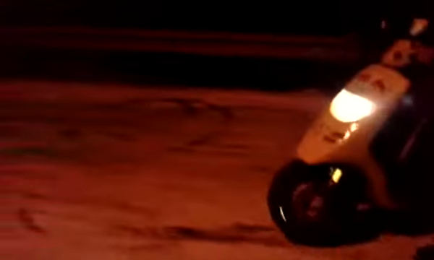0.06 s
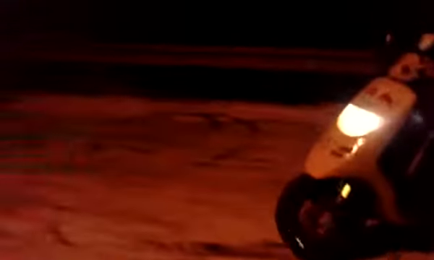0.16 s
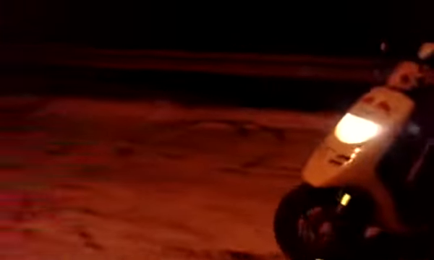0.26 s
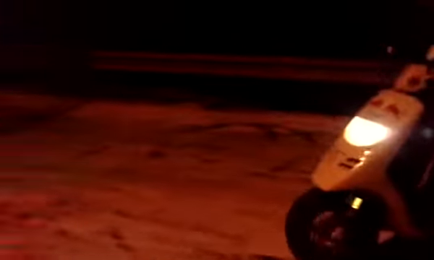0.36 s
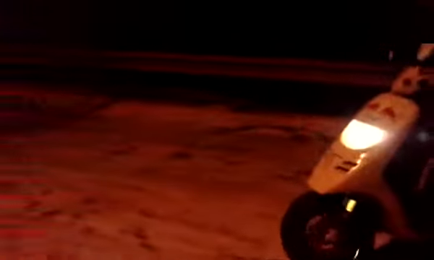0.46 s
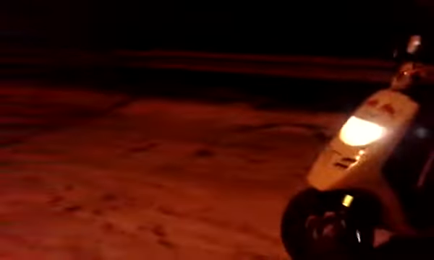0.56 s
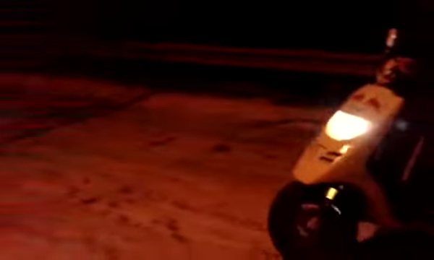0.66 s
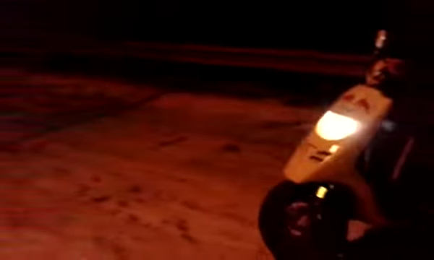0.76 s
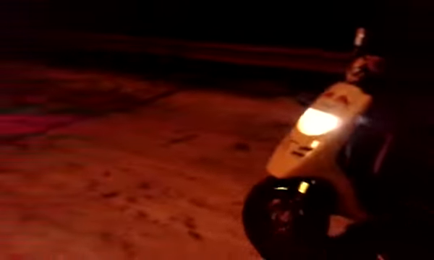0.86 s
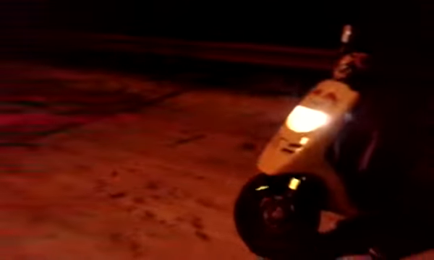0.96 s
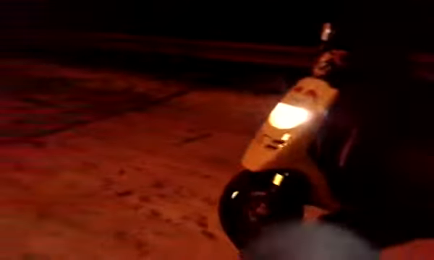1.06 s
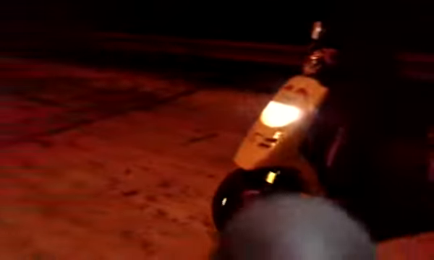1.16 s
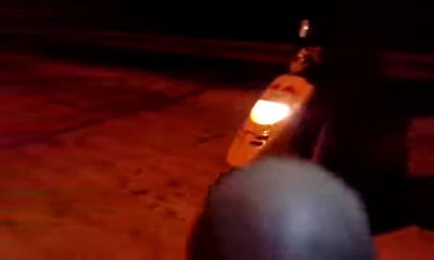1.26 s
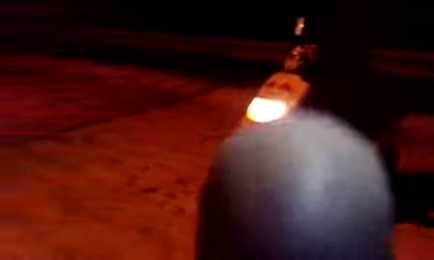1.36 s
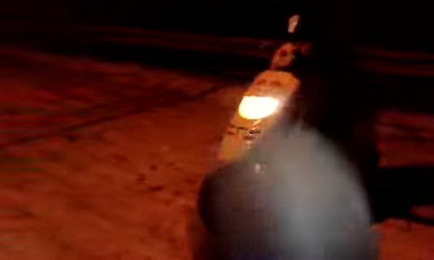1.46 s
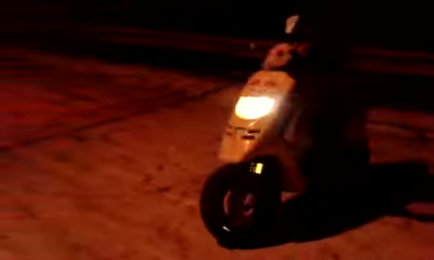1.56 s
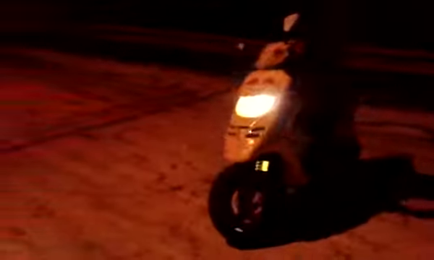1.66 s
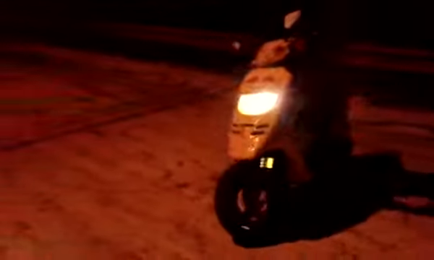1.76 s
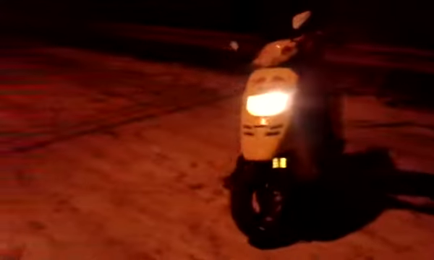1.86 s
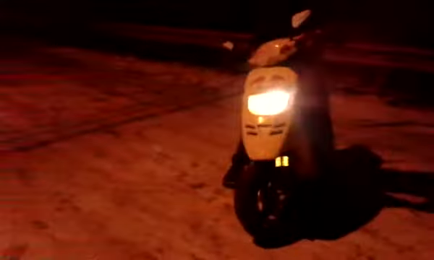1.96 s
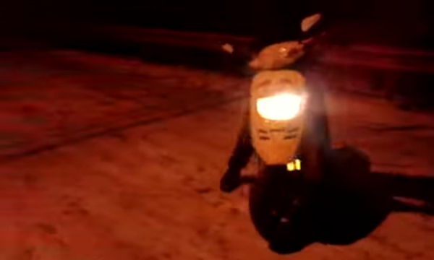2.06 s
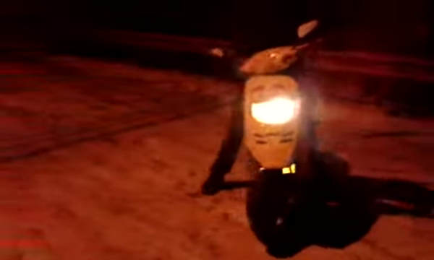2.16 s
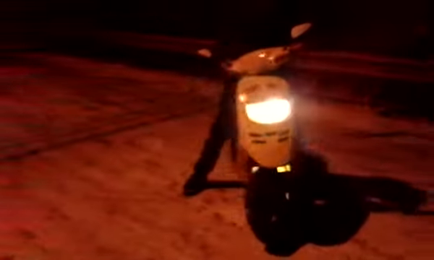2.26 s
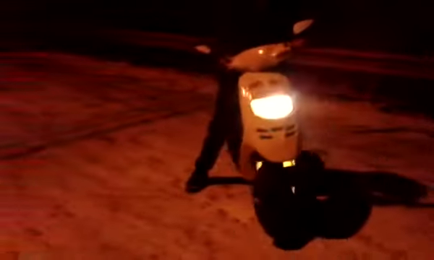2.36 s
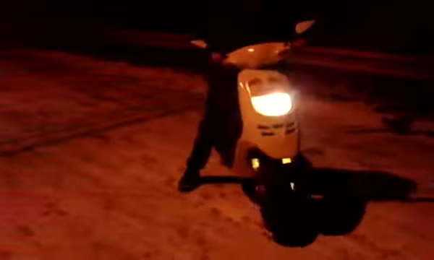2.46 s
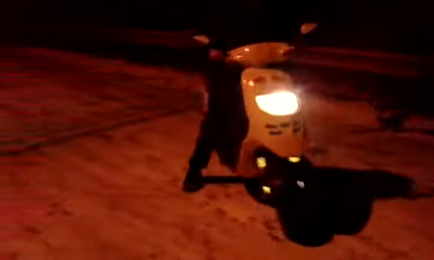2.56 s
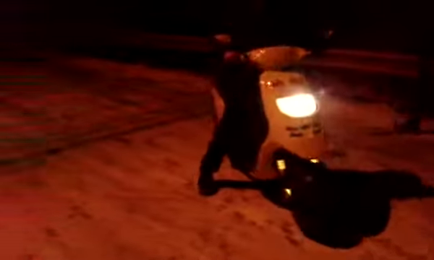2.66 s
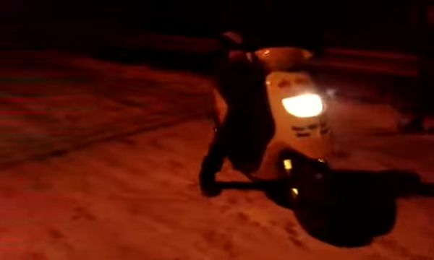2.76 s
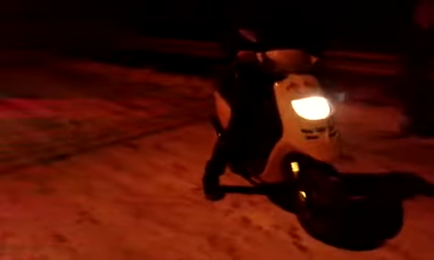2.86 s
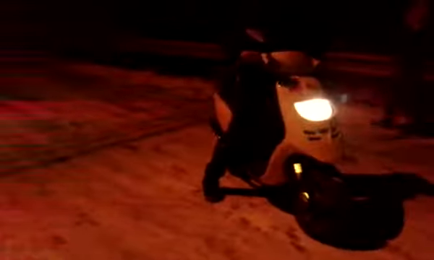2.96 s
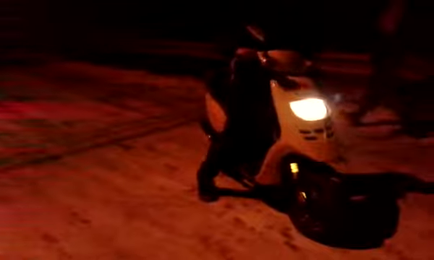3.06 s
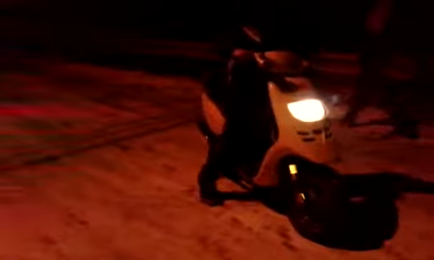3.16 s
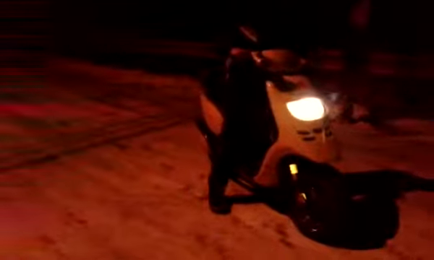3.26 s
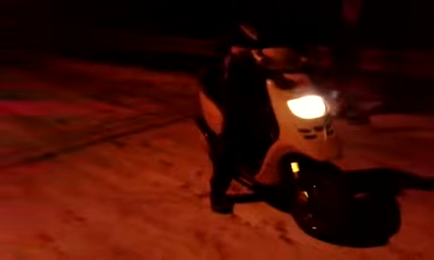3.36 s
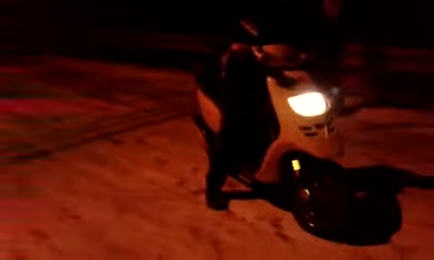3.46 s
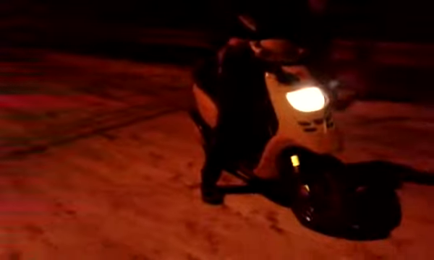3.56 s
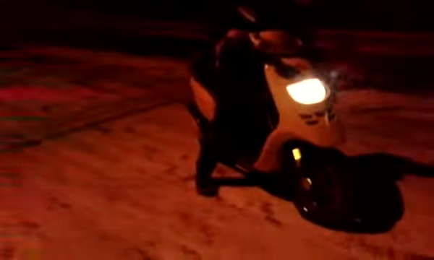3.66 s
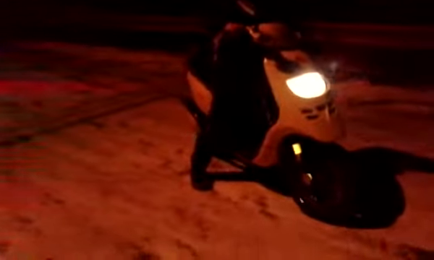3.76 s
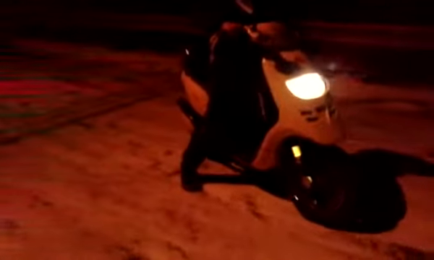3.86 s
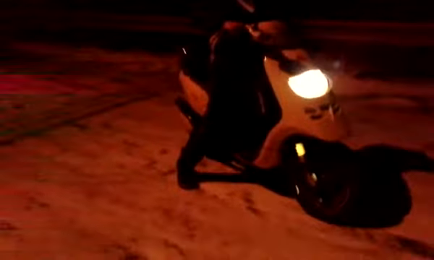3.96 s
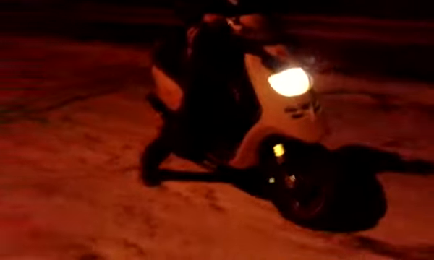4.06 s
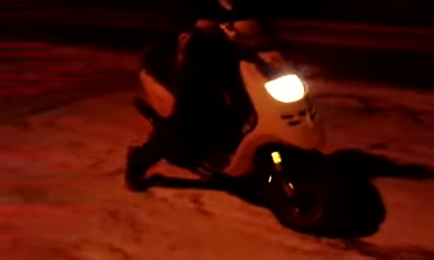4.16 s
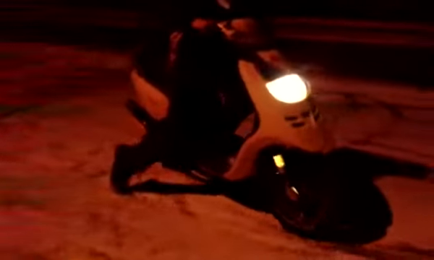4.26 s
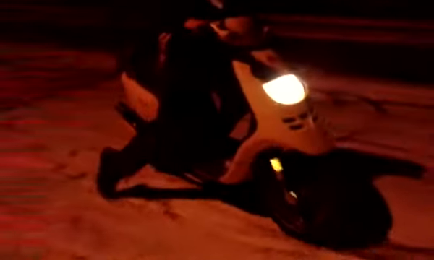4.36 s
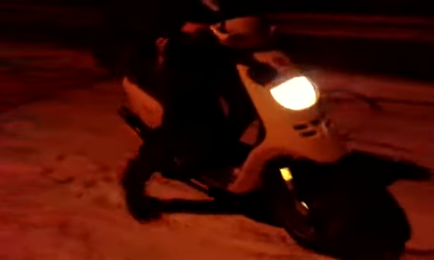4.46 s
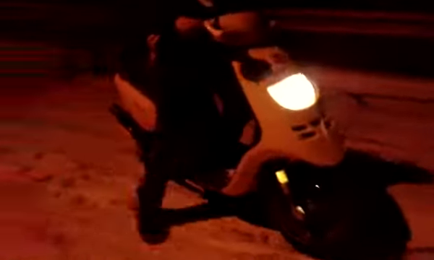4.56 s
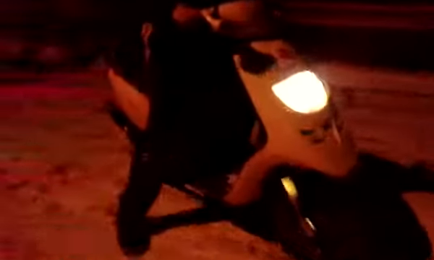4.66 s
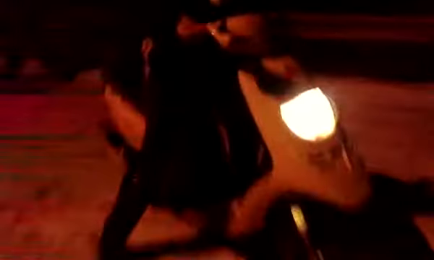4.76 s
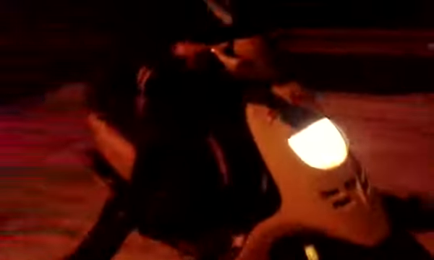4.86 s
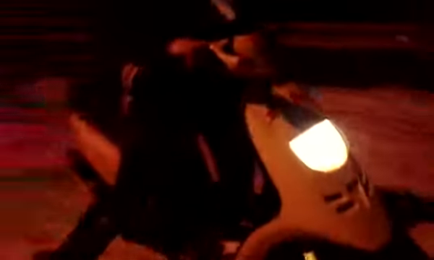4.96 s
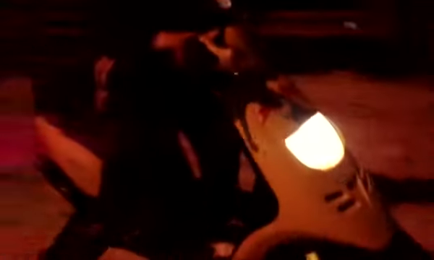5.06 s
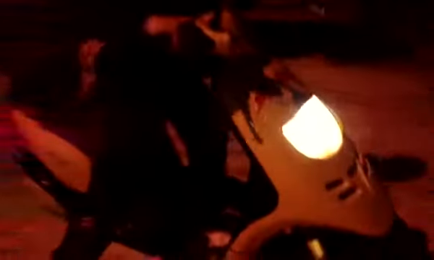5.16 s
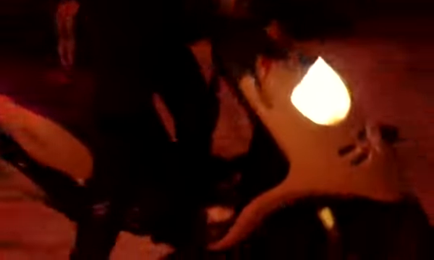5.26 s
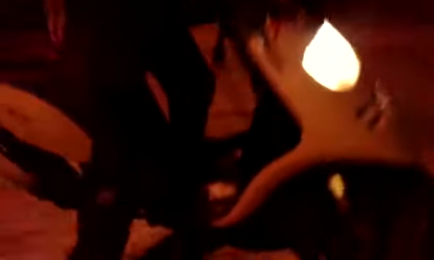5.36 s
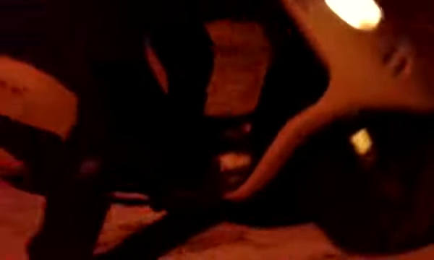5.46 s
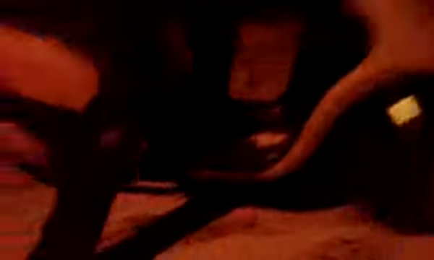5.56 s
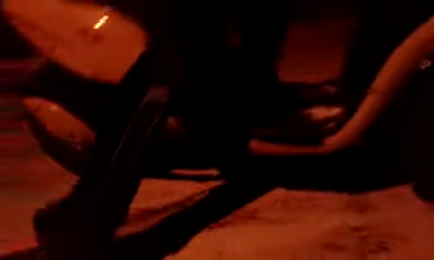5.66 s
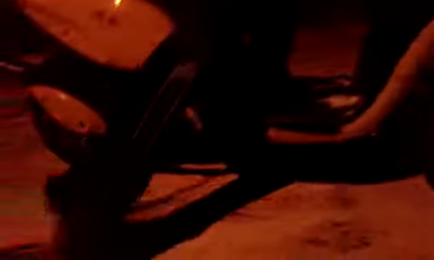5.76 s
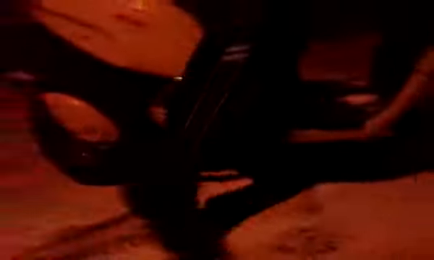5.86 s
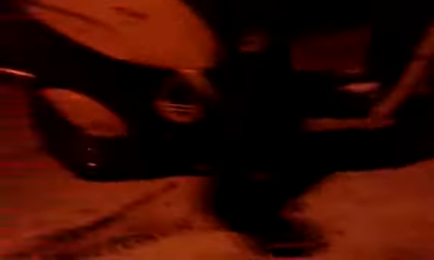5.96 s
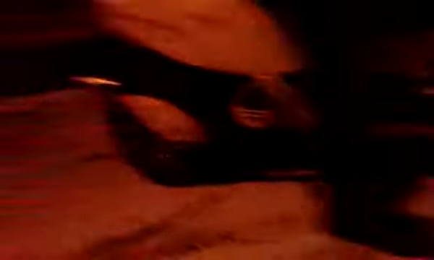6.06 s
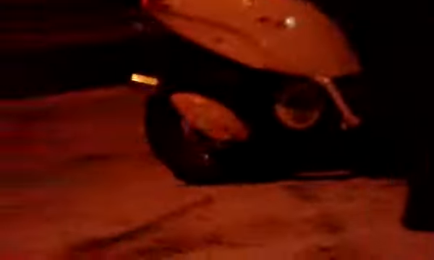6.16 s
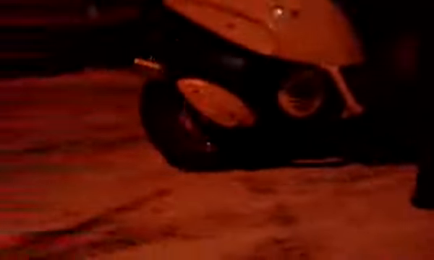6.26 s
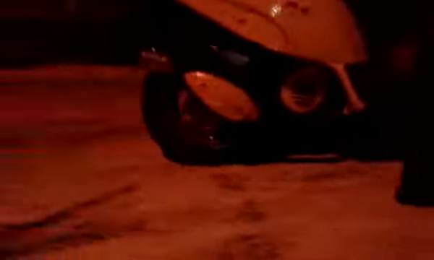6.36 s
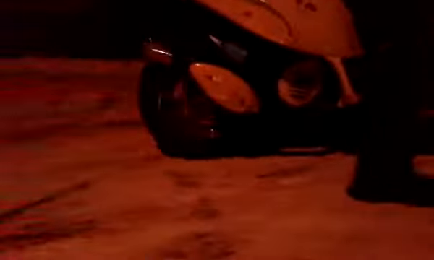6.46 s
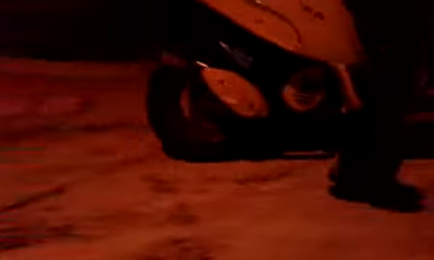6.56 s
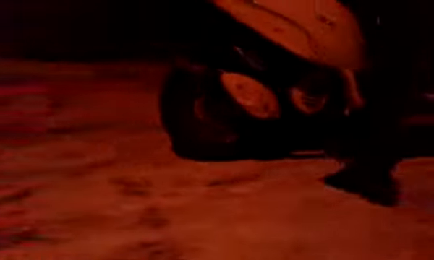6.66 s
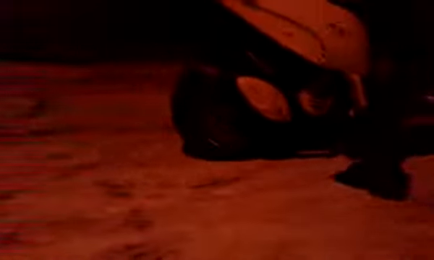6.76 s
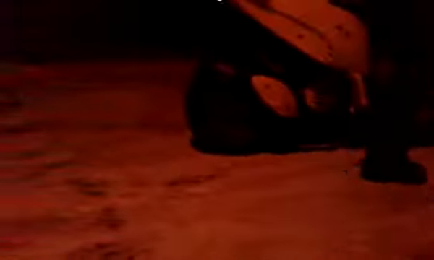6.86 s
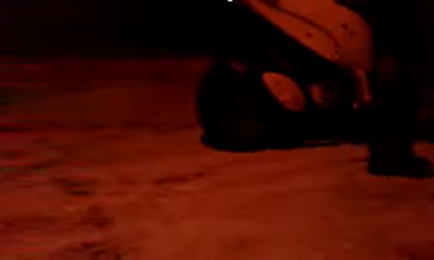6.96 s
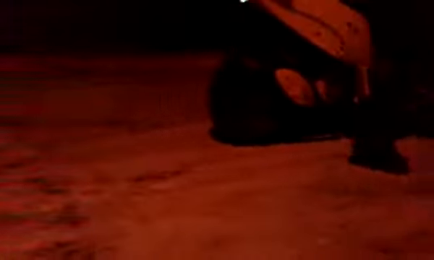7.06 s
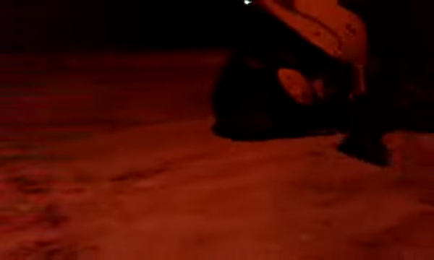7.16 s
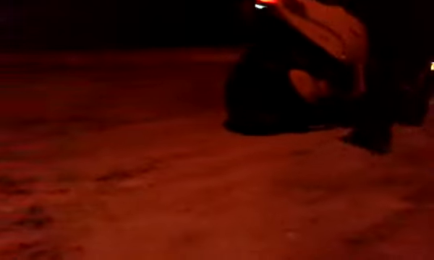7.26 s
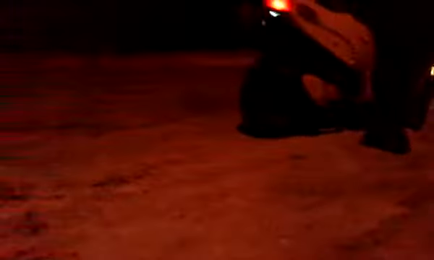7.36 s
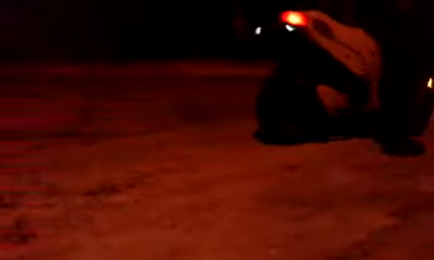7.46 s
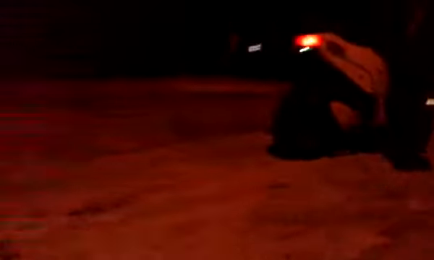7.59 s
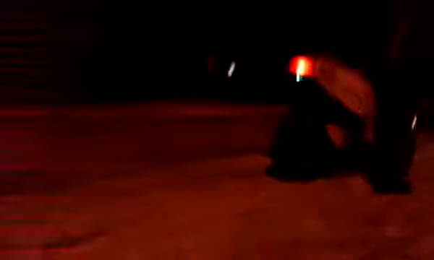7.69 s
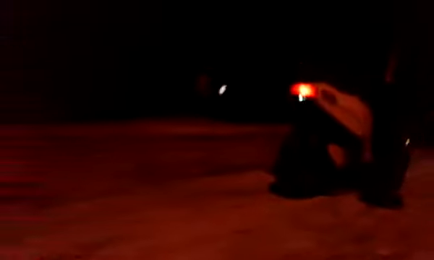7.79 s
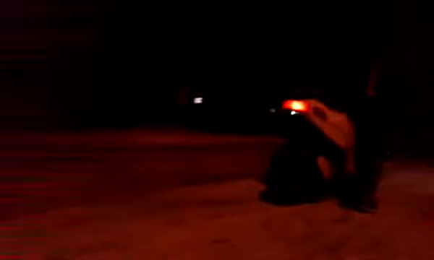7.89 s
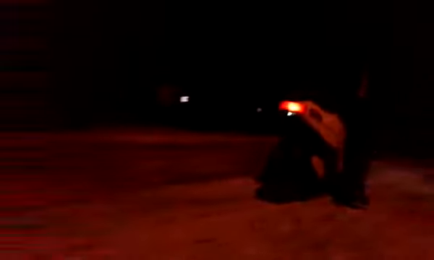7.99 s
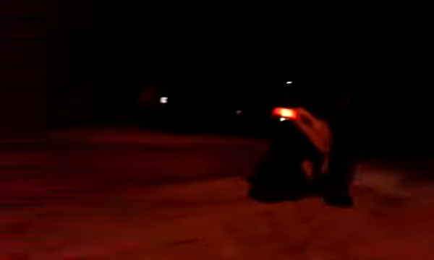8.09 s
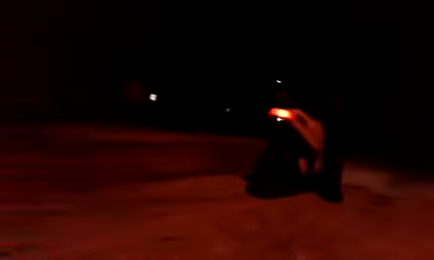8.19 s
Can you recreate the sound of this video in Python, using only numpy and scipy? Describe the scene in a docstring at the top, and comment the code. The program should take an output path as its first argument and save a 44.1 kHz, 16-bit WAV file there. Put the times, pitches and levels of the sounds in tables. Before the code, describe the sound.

A small two-stroke scooter revs up and down, stutters as it creeps close past, then pulls away.

```python
"""A two-stroke scooter on a paved lot

The scooter revs up and down, creeps close past and rides off. Every turn of the engine pumps the
exhaust pipe, honks the airbox and rattles the metal; every firing barks out of the silencer.
With the throttle shut it skips firings and stutters. Speed, throttle, distance and the side facing us
set the main sounds; the pipe's rings swell and slide on their own. Close by, the microphone overloads."""
import sys
import numpy as np
from scipy import signal
from scipy.fft import rfft, irfft, next_fast_len
from scipy.io import wavfile
from scipy.ndimage import uniform_filter1d

SR = 44100
rng = np.random.default_rng(int(sys.argv[2]) if len(sys.argv) > 2 else 0)


def digitize_waveform(pressure):
    """Quantize a signal to 16-bit integers and store it at the path in sys.argv[1].

    Rows of a 2-D input are taken as channels; values are limited to [-1, 1].
    """
    field = np.atleast_2d(pressure).T
    bounded = np.clip(field, -1, 1)
    quanta = np.round(bounded * 32767).astype(np.int16)
    wavfile.write(sys.argv[1], SR, quanta)


N = 362935

# how fast the engine turns: t/s, turns per second/Hz
ENGINE_SPEED = [(0, 71.7), (.2, 77.4), (.41, 83.6), (.5, 85.9), (.62, 87.1), (.8, 90.17), (.9, 90.57),
                (1.03, 86.9), (1.15, 82.7), (1.28, 80.2), (1.4, 78.8), (1.66, 78.3), (1.77, 78.8),
                (1.86, 80.7), (2.07, 86.7), (2.42, 94.5), (2.56, 96), (2.68, 96.3), (2.74, 94.3),
                (3.02, 78.18), (3.19, 75.85), (3.71, 77.9), (4.01, 80.03), (4.38, 83.7), (4.88, 81.7),
                (5.3, 65.19), (5.75, 52.99), (6, 50.81), (6.26, 61.51), (6.55, 84.98), (6.65, 90.77),
                (7.02, 76.21), (7.16, 75.04), (7.38, 74.31), (7.91, 80.35), (8.23, 80.49)]
# the side facing us: t/s, side (0 left front, 1 head-on, 2 right front, 3 right flank, 4 tail)
SIDE_FACING = [(0, 0), (1.4, 0), (2.1, 1), (2.68, 1), (3.1, 2), (4.8, 2), (5.2, 3), (6.2, 3), (6.7, 3.3),
               (7.15, 3.7), (7.7, 4), (8.23, 4)]
# how far away the exhaust is: t/s, distance/m
DISTANCE = [(0, 3.32), (1.1, 2.85), (1.6, 3.56), (2.2, 4.96), (2.65, 3.52), (3.6, 3.64), (4.2, 3.5),
            (4.7, 2.78), (5.6, 2.44), (6.15, 1.54), (6.38, 1.06), (6.62, 0.99), (7.2, 1.69), (7.7, 2.3),
            (8.23, 3.2)]
# twists of the throttle: start/s, end/s, opening (0 shut, 1 full)
TWISTS = [(0.407, 1, 0.72), (1.827, 2.69, 0.68), (4.22, 4.875, 0.6), (5.967, 6.75, 0.16)]
# stutters with the throttle shut: start/s, end/s, turns skipped, turns fired, exhaust gain/dB
STUTTERS = [(2.715, 2.847, 3, 3, -3), (2.848, 3.025, 3, 2, -3), (3.028, 3.105, 2, 2, -2),
            (4.881, 5.018, 3, 3, -1.5), (5.02, 5.225, 3, 2, 0), (5.228, 5.525, 2, 2, 0.5),
            (5.528, 5.76, 1, 1, 2), (5.78, 5.855, 2, 2, -3), (5.856, 5.915, 1, 1, 1),
            (6.764, 6.86, 2, 2, -1), (6.87, 7.02, 2, 2, -1), (7.035, 7.062, 2, 2, -1)]

# Each sound's base level at 1 m and 80 turns a second, throttle shut:
# level/dB for each of the five sides, gain at full throttle/dB, gain per doubling of speed/dB
BARK_LEVELS = (-12, -13, -9, -13, -9.5, -1, -1)
CRACK_LEVELS = (-16, -10, -12, -28, -18, -10, -1)
HISS_LEVELS = (-29.5, -28.5, -24.5, -24, -21.5, 1.5, 6.5)
DRONE_LEVELS = (-34.5, -31, -31, -34, -62, 6.5, -6.5)
GROWL_LEVELS = (-46, -31.5, -37, -33, -33.5, 11.5, 3.5)
HONK_LEVELS = (-18.5, -16, -18.5, -21.5, -18, 6.5, -4.5)
CLATTER_LEVELS = (-16, -11, -12.5, -11, -12, 2.5, 4.5)
FAN_LEVELS = (-17, -46, -54, -7, -47, -8.5, 14)

# Each sound's colour, or how strong its low and high parts are: f/Hz, gain/dB
RUMBLE_COLOUR = [(20, 3), (60, -3), (120, 3.5), (200, 8.5), (400, 6), (900, -40)]
BARK_COLOUR = [(150, -56), (700, -27), (1400, -1), (1900, -1), (2330, -1), (2750, 5), (3030, 3),
               (3350, 1.5), (4000, 4), (4900, -4), (5500, -5.5), (9000, -54)]
HISS_COLOUR = [(3000, -37), (5000, -4), (6000, 14), (7500, 11.5), (9000, 4), (10500, -21.5), (14000, -78.5)]
SIZZLE_COLOUR = [(7000, -37), (9300, 9), (10600, 2), (13000, -47)]
HONK_COLOUR = [(40, -50), (100, -35), (200, -31), (320, -20), (400, -8.5), (460, -4), (560, -1),
               (750, -1.5), (900, -3.5), (1150, -8), (1500, -2.5), (3000, -92)]
CLATTER_COLOUR = [(40, -55), (120, -25.5), (400, -10.5), (900, -4), (1400, -2), (1800, 2), (2400, -1.5),
                  (2750, -1), (3030, -1.5), (3400, -2), (4800, -3.5), (5500, -12.5), (10000, -74)]
FAN_COLOUR = [(1200, -17.5), (1335, -13.5), (1390, -1), (1450, 0), (1580, -27)]

# Resonances, the pitches at which a part likes to ring: f/Hz, width/Hz, gain/dB
PIPE_RINGS = [(173, 66, -11.5), (238.6, 47, 3.5), (366, 22, 4.5)]
CASING_RINGS = [(1480, 63, 7.5), (1990, 37, -11)]
CLINK_RINGS = [(5500, 93, 31), (5660, 150, 29)]
# Resonances that sound different from each side: f/Hz, width/Hz, gain/dB for each of the five sides
SILENCER_RINGS = [(1142, 88, 2, -11, -4, 13.5, -5), (1396, 160, -0.5, 6, -13, 2, -15),
                  (1810, 83, 10, -15, 5, -14, -1), (1913, 57, -21, 9.5, 14.5, -14, -21),
                  (2137, 150, 8, 9, 6, -28, 2), (2447, 120, 1.5, 2, -3.5, -12, -2.5),
                  (3302, 180, -12, 3, 1.5, -9, 1), (3560, 47, -20, 3, -20, -2, -3),
                  (3760, 76, -20, 6.5, -4, 5, 0.5), (4350, 94, 2, -1, -0.5, -4, -3),
                  (5170, 510, -29, -3, -1, 1, 0)]
AIRBOX_RINGS = [(291, 35, -19, -11, -9, -3, -8), (360, 144, -17, -19, -1.5, 11, 16.5),
                (501, 81, -12, -5, 3.5, -0.5, -4), (563, 52, -11, 7, -1, -3, -9),
                (618.4, 28, 10.5, -6, 3, 10.5, 6), (684, 50, 6.5, 6, 2, -5, 11),
                (744, 24, -6, 2, 5, 10.5, 13.5), (909.5, 28, 8.5, 0, 9.5, 11, 5),
                (1180, 94, 10.5, -18, 10.5, 6.5, -9)]
# pitch of the expansion chamber, the wide part of the pipe: f/Hz for each of the five sides
GROWL_PITCH = (362, 358, 385, 362, 385)
# the two cracks of each firing: delay/s, f/Hz, decay/s, gain/dB
CRACKS = [(.0002, 2110, 0.00031, -2), (.0031, 3300, 0.00027, -7.5)]

# Tones that slide and swell: t/s, f/Hz, level/dB
SHELL_RING = [(0, 2730, -20), (.8, 2810, -24.5), (1.05, 2820, -19.5), (1.3, 2780, -21.5),
              (1.52, 2755, -26.5), (1.8, 2700, -35), (2.9, 2770, -47), (3.2, 2705, -23.5), (4, 2740, -24.5),
              (4.2, 2740, -30), (4.5, 2790, -24.5), (4.75, 2800, -21.5), (5.25, 2740, -33),
              (5.95, 2740, -52), (6.3, 2790, -22), (6.6, 2800, -19), (6.9, 2800, -20), (7.18, 2744, -14.5),
              (7.5, 2766, -26), (8.23, 2680, -38)]  # the silencer's metal shell, a little higher when the gas is hot
TAILPIPE_RASP = [(0, 3310, -37), (.9, 3420, -29), (1.6, 3400, -36), (1.87, 3060, -27), (2.1, 3430, -30.5),
                 (2.3, 3450, -24), (2.52, 3800, -31.5), (2.7, 3630, -24), (2.9, 3440, -43),
                 (3.2, 3260, -33), (4, 3240, -36), (4.45, 3410, -25.5), (4.8, 3400, -24), (5.1, 3730, -26),
                 (5.6, 3770, -24), (6.0, 3500, -25), (6.12, 3540, -20), (6.27, 3930, -27),
                 (6.42, 3920, -20), (6.5, 3400, -23), (6.64, 3440, -13.5), (7.0, 3140, -25.5),
                 (7.7, 3230, -21), (8.23, 3240, -23.5)]  # climbs with the heat of the gas
THIN_WHINE = [(1.7, 4000, -52), (2.0, 4270, -45), (2.65, 4380, -38), (2.9, 4460, -55), (3.3, 4770, -28.5),
              (4.0, 4820, -26.5), (4.6, 5030, -41), (5.8, 4200, -38), (6.2, 4370, -36), (6.35, 4630, -16),
              (6.47, 5020, -26), (6.65, 5130, -26), (7.1, 4630, -27), (7.6, 4550, -26.5), (8.23, 4340, -33)]  # rises when the engine works hard
MIDDLE_RING = [(1.7, 1560, -32), (2.05, 1740, -36), (2.3, 1830, -34), (2.6, 1920, -34), (2.9, 2020, -24),
               (3.2, 1990, -28), (3.9, 2064, -27), (4.6, 1920, -29), (5.1, 1930, -28), (6.1, 2010, -32),
               (6.4, 2294, -20), (6.7, 2260, -26), (7, 2310, -18.5), (7.3, 2414, -21), (7.7, 2500, -25),
               (8.23, 2110, -39)]  # the middle of the silencer, sliding with the load
WHIRR_TONE = [(4.7, 1800, -90), (4.9, 1720, -22), (5.15, 1657, -34), (5.35, 1470, -25.5), (5.6, 1443, -27),
              (5.7, 1370, -20), (5.85, 1337, -28), (6.2, 1370, -90)]  # the transmission
# Swells of the chamber's howl, the silencer's zing and the deep thrum: t/s, level/dB
HOWL_SWELL = [(0, -45), (.7, -30), (1.3, -43), (1.95, -33), (2.2, -48), (4.6, -37), (4.95, -31), (5.2, -28),
              (5.75, -32), (5.85, -20), (6.35, -22), (6.55, -27), (7.05, -30), (7.28, -16), (7.55, -29),
              (8.23, -45)]
ZING_SWELL = [(0, -38), (.85, -37), (1.1, -29), (1.4, -26.5), (1.9, -42), (3.1, -44), (3.4, -33),
              (4.2, -40), (4.6, -25.5), (5.6, -24), (6.4, -31), (6.9, -26), (7.6, -28), (8.23, -39)]
THRUM_SWELL = [(2.2, -80), (2.38, -54), (2.68, -51), (2.82, -80)]

HELD_OPENING = .24  # the throttle between twists


def gain(db):
    """Turn decibels into a number to multiply by."""
    return 10 ** (np.asarray(db) / 20)


def curves(table):
    """Each column after the time, as one value per sample."""
    times, *columns = np.transpose(table)
    return [np.interp(np.arange(N) / SR, times, column) for column in columns]


def unit(x):
    """Scale to an average (rms) level of 1."""
    return x / np.sqrt(np.mean(x ** 2))


def even(x):
    """Hold the level near 1 over each third of a second."""
    return x / np.sqrt(uniform_filter1d(x ** 2, size=SR // 3) + 1e-12)


def colour(x, points):
    """Make pitches louder or softer along (f/Hz, gain/dB) points."""
    hz, db = np.transpose(points)
    n = next_fast_len(N + SR // 10, True)
    f = np.maximum(np.arange(n // 2 + 1) * SR / n, 1)
    return irfft(rfft(x, n) * gain(np.interp(np.log(f), np.log(hz), db)), n)[:N]


def wander(hz):
    """A random wobble of size about 1, mostly slower than hz."""
    return unit(colour(rng.standard_normal(N), [(hz, 0), (4 * hz, -25), (20 * hz, -80)]))


def blend(position, sounds):
    """Fade along a row of sounds: position 0 is the first, 1 the second."""
    return sum(np.maximum(1 - np.abs(position - k), 0) * x for k, x in enumerate(sounds))


def ring(x, resonances):
    """Let a sound ring some resonances, and add them up."""
    return sum(gain(db) * signal.lfilter(*signal.iirpeak(hz, hz / width, SR), x)
               for hz, width, db in resonances)


def narrow_ring(x, hz, width_hz):
    """One sharp resonance at a steady level."""
    resonance = [(hz, width_hz, 0)]
    return even(ring(ring(x, resonance), resonance))


def hollow_body(x, resonances, side, body_colour):
    """Pass a sound through a body that rings differently to each side."""
    rings = np.array([ring(x, [(hz, width, 0)]) for hz, width, *_ in resonances])
    sides = x + gain(np.array(resonances)[:, 2:]).T @ rings
    return even(colour(blend(side, sides), body_colour))


def clicks(times, sizes):
    """Clean clicks that can fall between samples."""
    at = times[:, None] * SR
    taps = at.astype(int) + np.arange(-7, 9)
    shape = np.sinc(taps - at) * np.sinc((taps - at) / 8)
    return np.bincount(np.clip(taps, 0, N).ravel(), (sizes[:, None] * shape).ravel(), N + 1)[:N]


def burst(times, sizes, rise_s, fall_s, noise_db):
    """Each stroke scatters into a short burst: echoes that repeat every turn, plus fresh gas noise."""
    t = np.arange(SR // 40) / SR
    shape = (1 - np.exp(-t / rise_s)) * np.exp(-(t / fall_s) ** 2)
    pulses = clicks(times, sizes)
    paths = shape * rng.standard_normal((7, len(t)))
    for _ in range(3):  # make the echoes smear a stroke but barely colour it
        spectrum = rfft(paths, 2 * len(t))
        paths = irfft(spectrum / np.abs(spectrum))[:, :len(t)] * np.tanh(10 * shape)
    drift = np.linspace(0, len(paths) - 1, N)  # the echoes change slowly as the scooter moves
    echoes = blend(drift, signal.oaconvolve(pulses[None], paths, axes=1)[:, :N])
    gas = signal.oaconvolve(pulses, shape)[:N] * rng.standard_normal(N)
    return even(echoes) + gain(noise_db) * even(gas)


def pings(times, sizes, hz, decay_s):
    """Each stroke starts a short tone that swells and dies; hz has one pitch per sample."""
    at = (times * SR).astype(int)
    taps = at[:, None] + np.arange(1, SR // 30)
    t = taps / SR - times[:, None]
    pitch = hz[np.clip(at, 0, N - 1), None]
    tones = sizes[:, None] * t * np.exp(-t / decay_s) * np.sin(2 * np.pi * pitch * t)
    return even(np.bincount(np.clip(taps, 0, N).ravel(), tones.ravel(), N + 1)[:N])


def glide(times, sizes, table, decay_s, detune):
    """Pings that follow a table's pitch and level; swirling gas puts each a little out of tune."""
    hz, db = curves(table)
    return pings(times, sizes, hz * (1 + detune * rng.standard_normal(N)), decay_s) * gain(db)


def turns_so_far():
    """How many turns the engine has made at each sample."""
    return np.cumsum(curves(ENGINE_SPEED)[0]) / SR


def crank():
    """When each turn comes and whether it fires: a stutter skips some, fires some, and repeats."""
    turns = turns_so_far()
    times = np.interp(np.arange(int(turns[-1]) + 1), turns, np.arange(N) / SR)
    fired = np.ones(len(times), bool)
    for start, end, skipped, lit, _ in STUTTERS:
        inside = np.flatnonzero((times > start) & (times < end))
        fired[inside] = np.arange(len(inside)) % (skipped + lit) >= skipped
    return times, fired


def throttle(wrist_s=.33):
    """The hand holds the throttle part open, twists it now and then, and eases it shut for stutters."""
    t = np.arange(N) / SR
    opening = np.full(N, HELD_OPENING)
    for start, end, wide in TWISTS:
        opening[(t > start) & (t < end)] = wide
    for start, end, *_ in STUTTERS:
        opening[(t > start) & (t < end)] = 0
    return uniform_filter1d(opening, size=int(wrist_s * SR))


def loudness(levels, side, opening):
    """A sound's gain follows the side facing us, the throttle and the speed, and falls with distance."""
    *sides_db, throttle_db, speed_db = levels
    doublings = np.log2(curves(ENGINE_SPEED)[0] / 80)
    db = blend(side, sides_db) + throttle_db * opening + speed_db * doublings
    return gain(db) / curves(DISTANCE)[0]


def air_rumble(flank):
    """A low, gusty rumble of air, louder beside the open side of the engine."""
    air = unit(colour(rng.standard_normal(N), RUMBLE_COLOUR))
    return air * gain(-47.5 + 6.5 * flank + 2.8 * wander(hz=6.9))


def cracks(times, sizes):
    """A firing cracks as the exhaust port opens, and again as the wave comes back along the pipe."""
    return sum(pings(times + delay, sizes, np.full(N, hz), decay) * gain(db)
               for delay, hz, decay, db in CRACKS)


def exhaust_rings(times, sizes, blast, flank):
    """Firings ring the silencer and tailpipe; the blast howls in the chamber and zings at the mouth."""
    detune = .006 + .012 * np.minimum(2 * flank, 1)
    shell = glide(times + .000543, sizes, SHELL_RING, decay_s=.0027, detune=detune * .72)
    rasp = glide(times + .000987, sizes, TAILPIPE_RASP, decay_s=.0016, detune=detune)
    whine = glide(times + .000997, sizes, THIN_WHINE, decay_s=.0013, detune=detune)
    middle = glide(times, sizes, MIDDLE_RING, decay_s=.0025, detune=detune)
    howl = narrow_ring(blast, hz=1688, width_hz=124) * gain(curves(HOWL_SWELL)[0])
    zing = narrow_ring(blast, hz=4690, width_hz=640) * gain(curves(ZING_SWELL)[0])
    return shell + rasp + whine + middle + howl + zing


def gas_hiss(times, sizes, flank, opening):
    """The jet of gas hisses in puffs, and sizzles on the flank when the throttle is open."""
    puffs = burst(times, sizes, rise_s=.00057, fall_s=.0097, noise_db=5.5)
    stream = gain(-2 + 10 * opening) * rng.standard_normal(N)
    jet = (puffs + stream) * gain(1.23 * wander(hz=21))
    sizzle = flank * opening * even(colour(jet, SIZZLE_COLOUR)) * gain(11)
    return even(colour(jet, HISS_COLOUR)) + sizzle


def exhaust(times, fired, side, flank, opening):
    """Each firing blasts gas through the silencer, which barks, cracks, rings and hisses."""
    chance = rng.standard_normal((len(times), 2))
    # unburnt fuel makes the firings between misses harder and less punctual
    firing_share = uniform_filter1d(fired * 1., size=9).clip(.25, 1)
    sizes = np.where(fired, 1, gain(-13)) / np.sqrt(firing_share) * gain(1.08 * chance[:, 0])
    times = times + (.00001 + .00022 * (1 - firing_share)) * chance[:, 1]
    shut = 1 - np.minimum(opening / HELD_OPENING, 1)
    noise_db = -6.5 + 13.4 * flank + 3.7 * shut
    blast = burst(times - .0004, sizes, rise_s=.00036, fall_s=.0077, noise_db=noise_db)
    bark = hollow_body(blast, SILENCER_RINGS, side, BARK_COLOUR) * loudness(BARK_LEVELS, side, opening)
    crack = cracks(times, sizes) * loudness(CRACK_LEVELS, side, opening)
    rings = exhaust_rings(times, sizes, blast, flank)
    hiss = gas_hiss(times, sizes, flank, opening) * loudness(HISS_LEVELS, side, opening)
    # some stutters burble softly, others bang
    t = np.arange(N) / SR
    stutter_db = sum(db * ((t > start) & (t < end)) for start, end, _, _, db in STUTTERS)
    return (bark + crack + rings + hiss) * gain(uniform_filter1d(stutter_db, size=SR // 50))


def pipe_drone(times, fired, miss_db=-11):
    """The piston pumps the pipe every turn; the note needs a run of firings and sags in a stutter."""
    missed = 1 - uniform_filter1d(fired * 1., size=5)
    sizes = gain(miss_db * missed + 1.7 * rng.standard_normal(len(times)))
    pipe = ring(clicks(times, sizes), PIPE_RINGS)
    low_hum = [(50, -48.5), (90, -47), (150, -3), (300, .5), (420, -20.5), (800, -31), (2000, -49)]
    return unit(colour(pipe, low_hum))


def chamber_growl(times, fired, side):
    """Each firing thumps the expansion chamber; a missed turn thumps it more softly."""
    thumps = pings(times, np.where(fired, 1, .6), blend(side, GROWL_PITCH), decay_s=.0037)
    return colour(thumps, [(40, -43), (130, -26), (300, -1.5)])


def airbox_honk(times, fired, side):
    """Each gulp of air honks in the airbox and body panels, raggedly while the engine misses."""
    chance = rng.standard_normal((len(times), 2))
    sizes = np.where(fired, 1, .8) * gain(.76 * chance[:, 0])
    strokes = times + np.where(fired, .00004, .0005) * chance[:, 1]
    gulps = burst(strokes, sizes, rise_s=.0002, fall_s=.017, noise_db=-1)
    return hollow_body(gulps, AIRBOX_RINGS, side, HONK_COLOUR)


def engine_clatter(times, flank):
    """The piston slaps every turn, the belt churns on, and the casing rings on the open flank."""
    chance = rng.standard_normal((len(times), 2))
    slap_times = times - .0026 + .00002 * chance[:, 0]
    slap = burst(slap_times, gain(3.5 * chance[:, 1]), rise_s=.00014, fall_s=.0019, noise_db=-6.5)
    rattle = burst(times + .004, np.ones(len(times)), rise_s=.0009, fall_s=.0113, noise_db=-2.5)
    churn = rng.standard_normal(N) * gain(-5 + 3.2 * flank)
    engine = colour(gain(-3.5) * slap + rattle + churn, CLATTER_COLOUR)
    return even(engine + flank * ring(engine, CASING_RINGS))


def fan_tone(blades=16):
    """The fan's blades sing, flutter in the air they stir, and swell near the casing's resonance."""
    flutter = wander(hz=13.6)
    tone = np.sin(2 * np.pi * blades * turns_so_far() + .25 * flutter)
    return colour(unit(tone), FAN_COLOUR) * gain(4.5 * flutter)


def deep_thrum():
    """The exhaust's lowest note, one wave per turn, heard at the top of the head-on rev."""
    return unit(np.sin(2 * np.pi * turns_so_far())) * gain(curves(THRUM_SWELL)[0])


def transmission_whirr():
    """The transmission winds down with a rough, falling tone."""
    hz, db = curves(WHIRR_TONE)
    roughness = wander(hz=58) + 1j * wander(hz=53)
    return np.real(roughness * np.exp(2j * np.pi * np.cumsum(hz) / SR)) * gain(db)


def metal_clink(at_s=5.741):
    """One bright clink of metal among the stutters."""
    return ring(clicks(np.array([at_s]), np.ones(1)), CLINK_RINGS)


def scene():
    """All the scooter's sounds over the rumble of air, in one channel."""
    times, fired = crank()
    side, opening = curves(SIDE_FACING)[0], throttle()
    flank = np.maximum(1 - np.abs(side - 3), 0)  # 1 when the open side of the engine faces us
    mix = air_rumble(flank) + exhaust(times, fired, side, flank, opening)
    mix += pipe_drone(times, fired) * loudness(DRONE_LEVELS, side, opening)
    mix += chamber_growl(times, fired, side) * loudness(GROWL_LEVELS, side, opening)
    mix += airbox_honk(times, fired, side) * loudness(HONK_LEVELS, side, opening)
    mix += engine_clatter(times, flank) * loudness(CLATTER_LEVELS, side, opening)
    mix += fan_tone() * loudness(FAN_LEVELS, side, opening)
    mix += deep_thrum() + transmission_whirr() + metal_clink()
    return mix[None]


def record(dry):
    """The microphone flattens loud peaks; top treble and deep bass are cut, and what overshoots clips."""
    ceiling, treble_hz, bass_hz, top_hz = .76, 10700, 81, 15800
    wet = dry / (1 + (dry / ceiling) ** 8) ** (1 / 8)
    wet = signal.sosfilt(signal.ellip(6, .3, 55, treble_hz, fs=SR, output="sos"), wet)
    wet = signal.sosfilt(signal.butter(1, bass_hz, "high", fs=SR, output="sos"), wet)
    wet = np.clip(wet, -.75, .75)
    return signal.sosfilt(signal.ellip(8, .2, 70, top_hz, fs=SR, output="sos"), wet)


dry = scene()
out = record(dry)
digitize_waveform(out)
```